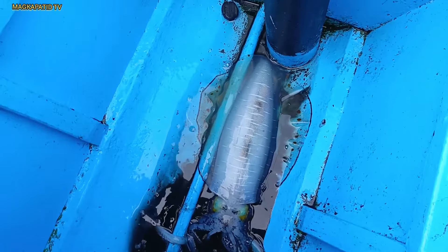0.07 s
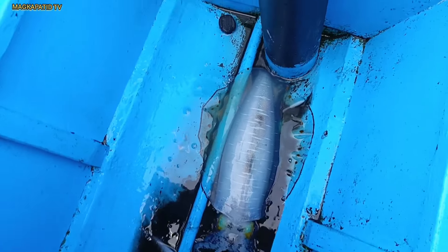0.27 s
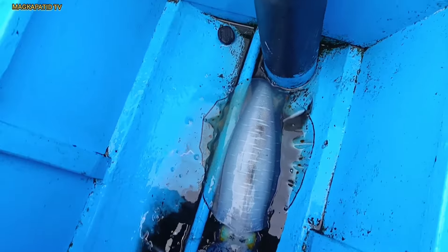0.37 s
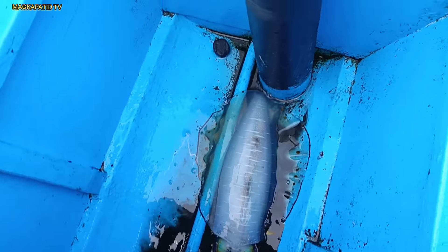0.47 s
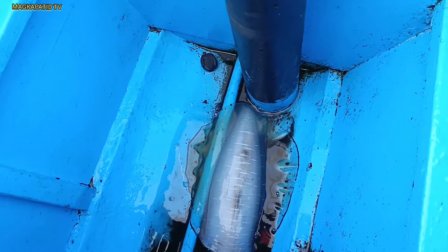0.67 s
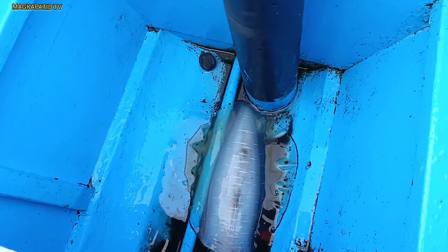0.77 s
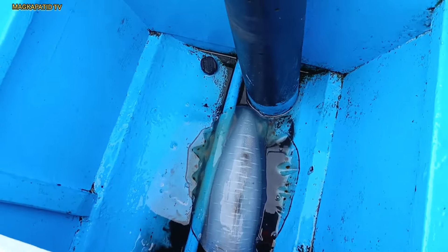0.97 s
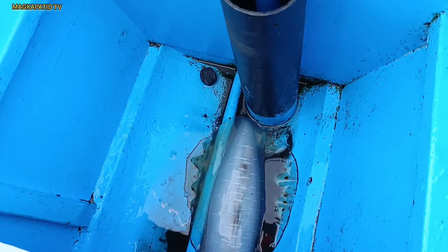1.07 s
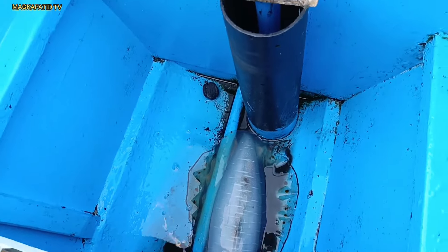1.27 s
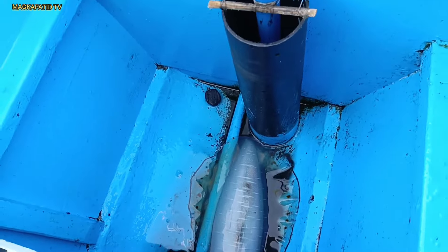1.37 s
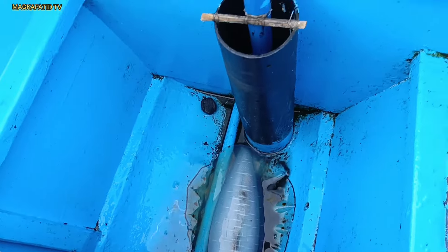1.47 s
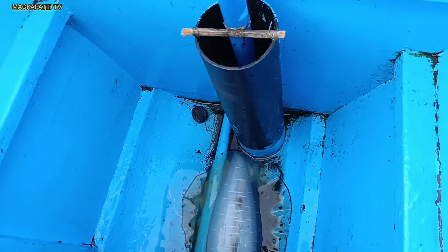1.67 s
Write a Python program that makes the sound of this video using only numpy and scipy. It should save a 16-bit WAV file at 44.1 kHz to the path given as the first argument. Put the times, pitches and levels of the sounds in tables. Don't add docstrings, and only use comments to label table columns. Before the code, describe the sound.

Close water splashing and trickling in a boat bottom, interrupted by one hard knock and later low thumps

```python
import sys
import numpy as np
from scipy import signal
from scipy.fft import rfft, irfft
from scipy.io import wavfile
from scipy.ndimage import uniform_filter1d

SR = 44100
rng = np.random.default_rng(int(sys.argv[2]) if len(sys.argv) > 2 else 0)


def elevation(decibels):
    levels = np.asarray(decibels, float)
    return 10 ** (levels / 20)


def materialize(psi):
    bounded = np.clip(np.atleast_2d(psi).T, -1, 1)
    quanta = np.round(bounded * 32767).astype(np.int16)
    wavfile.write(sys.argv[1], SR, quanta)


N = 74970

# (time [s], level [dB])
STIRRING = [
    (0.0, -39),
    (0.216, -41.5),
    (1.7, -43),
]
# (frequency [Hz], density [dB per Hz])
WATER_SPECTRUM = [(120, -43), (200, -5), (415, -1), (491, -10.0), (602, -1), (1910, -1.5), (3120, -15.5),
                  (6040, -17), (11500, -41.5), (15000, -74), (22000, -120)][:-2] + [(15000, -46.5)]
# (time [s], level [dB])
SWELL_LEVEL = [(0, -29), (.07, -37), (.19, -43.5), (0.551, -42), (.63, -53), (.7, -46), (.78, -46),
               (.85, -52), (.92, -55), (1.0, -43.5), (1.06, -59), (1.13, -50.5), (1.27, -60), (1.55, -41.5),
               (1.7, -47.5)]
# (frequency [Hz], density [dB per Hz])
BOOM_SPECTRUM = [(20, -9), (60, 16), (110, 13), (180, 6.5), (280, 4), (400, -53)]
# (time [s], level [dB], pitch [Hz], life [s])
SINGLE_BUBBLES = [(.052, -29.5, 1310, 0.013), (.132, -31.5, 1920, .035), (.674, -14.5, 1390, 0.0077),
                  (.678, -15, 1580, 0.0078), (.704, -21, 1900, .006), (.707, -24.5, 296.5, .011),
                  (.739, -21.5, 270.4, 0.025), (.748, -19.5, 1666, 0.0068), (.75, -20.5, 693, 0.01),
                  (.816, -33, 3770, .0065), (.822, -22.5, 1744, 0.0067), (.871, -37, 857, 0.0087),
                  (.886, -21.5, 610, 0.0048), (.898, -33, 325, .013), (.903, -32.5, 746, 0.017),
                  (.925, -34.5, 2970, 0.0042), (1.006, -33, 2056, 0.0065), (1.016, -34.5, 1560, 0.0043),
                  (1.024, -31.5, 1800, .005), (1.034, -33, 2100, 0.0035), (1.056, -41, 986, 0.0073),
                  (1.062, -32.5, 727, 0.014), (1.096, -33, 771, 0.012), (1.178, -37.5, 1810, 0.012),
                  (1.236, -36, 2187, 0.014), (1.243, -38, 880, 0.013), (1.278, -41.5, 1377, 0.016),
                  (1.559, -32.5, 2050, 0.0067), (1.571, -30, 2090, 0.0026), (1.586, -22, 2440, 0.0015),
                  (1.628, -30.5, 907, 0.017), (1.637, -23, 1420, 0.0026), (1.642, -22.5, 2120, 0.0032),
                  (1.65, -23, 1840, 0.0035), (1.654, -26.5, 2125, .014), (1.656, -34, 875, 0.0067)]
# (time [s], level [dB], pitch [Hz], life [s], climb [fraction per life])
CLIMBING_GURGLES = [
    (.669, -17.5, 960, 0.02, 0.118),
    (.679, -14, 1050, 0.01, 0.11),
    (.806, -32.5, 1910, .01, 0.045),
    (.856, -32.5, 280, 0.037, 0.061),
    (1.008, -32.5, 946, 0.019, 0.17),
    (1.031, -35.5, 1162, 0.015, 0.116),
    (1.174, -42.5, 1200, 0.051, .05),
]
# (delay [s], level [dB])
SIDE_ECHOES = [(.0021, -43), (.0037, -10), (.0064, -17)]
# (time [s], level [dB], contact [s])
WATER_THUMPS = [
    (0.087, -21.5, 0.013),
    (.95, -31.5, 0.0074),
    (1.3109, -19, 0.0066),
    (1.322, -5.5, 0.0015),
    (1.381, -14, 0.0059),
    (1.393, -10, 0.00075),
    (1.471, -20, 0.0034),
]
# (frequency [Hz], level [dB], ring time to -60 dB [s])
HULL_MODES = [(89, -5.5, 0.17), (106.2, -3.5, 0.55), (116.4, 2, 0.2), (151.5, -9.5, 0.18),
              (218.8, -10.5, 0.24), (262, -4, 0.13), (293.3, -16.5, 0.36), (550, -18, 0.11)]
# (time [s], spray level [dB], finest mist level [dB], fade [s])
SPLASHES = [(0.133, -43, -42.5, 0.11), (0.444, -33, -47, 0.083), (0.5547, -25.5, -62, 0.016),
            (0.585, -41, -37.5, 0.018), (0.6424, -33, -60, 0.12), (0.67, -22, -48, 0.18),
            (0.693, -24, -56, 0.15), (0.7059, -16, -39, 0.13), (0.7214, -23, -53, 0.031),
            (0.824, -35, -47, 0.18), (0.9121, -23.5, -34.5, 0.08), (0.921, -21.5, -37, 0.051),
            (0.9904, -37, -45.5, 0.2), (1.0076, -27.5, -54, 0.15), (1.0363, -26, -41, 0.076),
            (1.1019, -31, -46.5, 0.096), (1.131, -27, -36.5, 0.03), (1.357, -33, -43.5, 0.24),
            (1.563, -19.5, -30.5, 0.069), (1.5757, -21.5, -36.5, 0.073), (1.586, -19, -49, 0.11),
            (1.6361, -23.5, -33, 0.2), (1.6517, -15.5, -21, 0.093), (1.67, -27, -26, 0.04)]
# (frequency [Hz], density [dB per Hz])
SPRAY_SPECTRUM = [(880, -27), (1500, -7.5), (2090, 2.5), (2380, -2.0), (3310, -6.5), (6440, -7),
                  (9060, -17.5), (11500, -35.5), (15000, -72), (22000, -120)][:-2] + [(13000, -79)]
# (frequency [Hz], density [dB per Hz])
MIST_SPECTRUM = [(10000, -25), (12000, 14)]
# (time [s], level [dB], fade [s])
SLAP_EVENTS = [(0.133, -25.5, 0.25), (0.205, -7, 0.19), (0.446, -26, 0.6), (0.672, -10.5, 0.2),
               (0.703, -17.5, 0.43), (.74, -20, .15), (0.751, -15.5, 0.16), (0.822, -20, 0.22),
               (0.872, -23, 0.21), (0.905, -25.5, 0.16), (1.008, -26, 0.2), (1.019, -21, 0.18),
               (1.036, -33, 0.036), (1.06, -24.5, 0.12), (1.179, -32.5, 0.58), (1.214, -31, 0.2),
               (1.319, -24, 0.28), (1.389, -21, 0.12), (1.638, -36, 0.022), (1.653, -20.5, 0.22)]
# (frequency [Hz], density [dB per Hz])
SLAP_SPECTRUM = [(88, -50.5), (150, -19), (275, 2.5), (431, -8), (683, -1), (1570, -5), (1700, -5.5),
                 (3500, -28), (4550, -65), (7700, -120)]
# (time [s], level [dB])
KNOCK_BLOWS = [
    (0.2022, -2.5),
    (0.2108, -10),
]
# (frequency [Hz], level [dB], ring time to -60 dB [s])
DECK_MODES = [(79.14, -2.5, 0.62), (81.4, -5.5, 0.45), (107.8, -11.5, 0.59), (172, -12, 0.54),
              (258.2, -6, 0.19), (305.5, -6, 0.17), (467, -18, 0.22), (527, -10.5, 0.19), (543.6, -8, 0.13),
              (703, -10, 0.09), (819, -8, 0.065), (1127, -14, 0.11), (1499, -4.5, 0.029),
              (1810, -8.5, 0.041),
              (238.6, -11, 0.15), (343, -21, 0.058), (437, -15, 0.029), (566.7, -3, .08),
               (594, -12, 0.097), (960, -11, 0.08)]
# (frequency [Hz], gain [dB])
MIC_RESPONSE = [(11500, 0), (13800, 5.5), (14800, 21), (15400, 24.5), (15750, 26.5), (15950, -23),
                (16300, -39.5)]
# (time [s], length [s], from [Hz], to [Hz])
SUPPRESSOR_LULLS = [(.07, 0.052, 248, 400), (0.243, 0.1, 3100, 4230), (0.359, 0.096, 3300, 4240),
                    (.365, 0.075, 7000, 8200), (0.486, 0.069, 490, 700), (0.606, 0.12, 40.2, 100),
                    (1.019, .04, 69.4, 160), (1.186, 0.11, 360, 560), (1.23, .07, 40.2, 173),
                    (1.355, .05, 3150, 3600), (1.376, .05, 4000, 4550), (1.438, 0.081, 3000, 4650),
                    (1.447, 0.057, 6000, 7500), (1.47, 0.063, 450, 740)]


def evened(x):
    return x / np.sqrt(np.mean(x ** 2) + 1e-20)


def read(points, hz):
    f, value = np.transpose(points)
    return np.interp(np.log(hz + 1), np.log(f + 1), value)


def level_over_time(points):
    return elevation(np.interp(np.arange(N) / SR, *np.transpose(points)))


def add(mix, s, sound):
    part = mix[round(s * SR):][:len(sound)]
    part += sound[:len(part)]


def colour(x, points):
    gain = elevation(read(points, np.fft.rfftfreq(len(x), 1 / SR)))
    return irfft(rfft(x) * gain, len(x))


def ring(modes):
    t = np.arange(SR // 2) / SR
    out = np.zeros(len(t))
    for hz, db, t60 in modes:
        build_up = 1 - np.exp(-t * hz / 0.92)
        out += elevation(db - 60 * t / t60) * build_up * np.sin(2 * np.pi * hz * t)
    return out


def bubble(hz, life, climb=0.02):
    u = np.arange(0, 3, 1 / (life * SR))
    peak = 0.4
    shape = u / peak * np.exp(1 - u / peak)
    return shape * np.sin(2 * np.pi * hz * life * (u + climb * u ** 2 / 2))


def bursts(events, spectrum, rise_s, lump_db, snap_db, lump_samples):
    snap_fade_s = 0.018
    t, power = np.arange(SR // 4) / SR, np.zeros(N)
    for s, db, fade in events:
        body = elevation(-120 * t / fade)
        snap = elevation(2 * snap_db - 120 * np.maximum(t - rise_s, 0) / snap_fade_s)
        rise = np.minimum(t / rise_s, 1) ** 2
        add(power, s - rise_s, rise * elevation(2 * (db - 8.5)) * (body + snap))
    lumps = elevation(lump_db * evened(uniform_filter1d(rng.standard_normal(N), lump_samples)))
    edged = [(spectrum[0][0] / 3, -40)] + list(spectrum)
    return np.sqrt(power) * evened(colour(rng.standard_normal(N) * lumps, edged))


def bilge():
    patch_db, hiss_db = 3, 4
    trickle_db, trickle_per_s, trickle_spread_db = -5.5, 840, 5
    frames = N // 128 + 5
    real, imag, patches = rng.standard_normal((frames, 257, 3)).T
    patches = uniform_filter1d(patches, size=6, axis=0)
    patches = evened(uniform_filter1d(patches, size=12, axis=1))
    spectra = (real + 1j * imag) * elevation(patch_db * patches)
    hiss = evened(signal.istft(spectra, nperseg=512, noverlap=384)[1][:N])

    starts = rng.random(N) < trickle_per_s / SR
    size = elevation(trickle_spread_db * np.minimum(rng.exponential(1, N), 4)) * starts
    kind, drops = rng.integers(0, 24, N), np.zeros(N)
    for k, hz in enumerate(np.geomspace(450, 7000, num=24)):
        drop = bubble(hz, 4.9 / hz) * elevation(read(WATER_SPECTRUM, hz)) * hz ** 0.82
        drops += signal.oaconvolve(size * (kind == k), drop)[:N]
    water = elevation(hiss_db) * evened(colour(hiss, WATER_SPECTRUM)) + elevation(trickle_db) * evened(drops)
    return level_over_time(STIRRING) * water


def swell():
    boom = evened(colour(rng.standard_normal(N), BOOM_SPECTRUM))
    return boom * level_over_time(SWELL_LEVEL)


def bubbles():
    out = np.zeros(N)
    for s, db, hz, life in SINGLE_BUBBLES:
        add(out, s, elevation(db) * bubble(hz, life))
    for s, db, hz, life, climb in CLIMBING_GURGLES:
        add(out, s, elevation(db) * bubble(hz, life, climb))
    wobble = evened(colour(rng.standard_normal(N), [(200, -2), (600, -63)]))
    out = out * (1 + 0.55 * wobble)
    echoes = np.zeros(N)
    for k, (s, db) in enumerate(SIDE_ECHOES):
        echoes += (-1) ** k * elevation(db) * np.roll(out, round(s * SR))
    return out + echoes


def thumps():
    push = np.zeros(N)
    for s, db, contact in WATER_THUMPS:
        u = np.arange(0, 1, 1 / (contact * SR))
        add(push, s, elevation(db) * u * (1 - u) ** 2 * 12 / len(u))
    return signal.fftconvolve(push, ring(HULL_MODES))[:N]


def spray():
    events = [(s, db, fade) for s, db, _, fade in SPLASHES]
    return bursts(events, SPRAY_SPECTRUM, rise_s=0.005, lump_db=2.5, snap_db=-4.5, lump_samples=40)


def mist():
    events = [(s, db, fade) for s, _, db, fade in SPLASHES]
    fizz = bursts(events, MIST_SPECTRUM, rise_s=0.0025, lump_db=2.5, snap_db=1, lump_samples=40)
    return elevation(-10) * fizz


def slaps():
    return bursts(SLAP_EVENTS, SLAP_SPECTRUM, rise_s=0.0045, lump_db=3, snap_db=-22.0, lump_samples=120)


def knock():
    rattle_db, rattle_t60, rattle_per_s = -13, 0.28, 580
    blow, t = np.zeros(N), np.arange(SR // 3) / SR
    for s, db in KNOCK_BLOWS:
        add(blow, s, elevation([db]))
    loose = rng.standard_normal(len(t)) * (rng.random(len(t)) < rattle_per_s / SR)
    rattle = colour(loose, [(120, -34), (240, -0.5)]) * elevation(rattle_db - 60 * t / rattle_t60)
    add(blow, KNOCK_BLOWS[0][0], rattle)
    blow = np.convolve(blow, np.hanning(24) / 11)[:N]
    return signal.fftconvolve(blow, ring(DECK_MODES))[:N]


def band(x, lo_hz, hi_hz):
    return colour(x, [(lo_hz / 1.15, -40), (lo_hz, 0), (hi_hz, 0), (hi_hz * 1.15, -40)])


def suppress(x):
    lull_db, lump_db = -13.5, 2.5
    t = np.arange(N) / SR
    for s, length, lo_hz, hi_hz in SUPPRESSOR_LULLS:
        shut = np.clip(3 * np.sin(np.pi * np.clip((t - s) / length, 0, 1)), 0, 1)
        lumps = uniform_filter1d(rng.standard_normal(N), size=800)
        lumps = evened(uniform_filter1d(lumps, size=400))
        gain = elevation(shut * np.minimum(lull_db + lump_db * lumps, 0))
        x = x - band(x, lo_hz, hi_hz) * (1 - gain)
    return x


def scene():
    water = bilge() + bubbles() + spray() + mist() + slaps()
    boat = swell() + thumps() + knock()
    return (water + boat)[None]


def top_cut(x):
    return signal.sosfilt(signal.butter(12, 17170, fs=SR, output="sos"), x)


def record(dry):
    limit_db, squeeze, recover_db_per_s, ahead_s = -28.5, 0.26, 29, 0.0034
    treble_hz, treble_squeeze = 2810, 0.22
    low_cut = signal.cheby2(6, 30, 55.4, "high", fs=SR, output="sos")
    x = signal.sosfilt(low_cut, colour(dry[0], MIC_RESPONSE))

    bass = colour(x, [(600, -5.5), (1200, -38)])
    power_db = 10 * np.log10(abs(uniform_filter1d(bass ** 2, size=500)) + 1e-12)
    fall = np.arange(N) * recover_db_per_s / SR
    held_db = np.maximum.accumulate(power_db + fall) - fall
    over_db = np.maximum(held_db - limit_db, 0)

    treble = colour(x, [(treble_hz / 1.3, -40), (treble_hz, 0), (4600, 0), (5300, -2.5)])
    late_db = signal.lfilter([.001], [1, -.999], over_db)
    x = suppress(x - treble * (1 - elevation(-treble_squeeze * late_db)))

    ahead = np.arange(N) + ahead_s * SR
    over_db = np.interp(ahead, np.arange(N), uniform_filter1d(over_db, size=100))
    return top_cut((x / elevation(squeeze * over_db))[None])


dry = scene()
out = record(dry)
materialize(out)
```